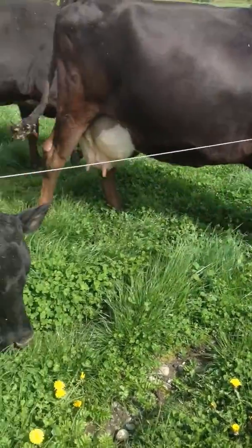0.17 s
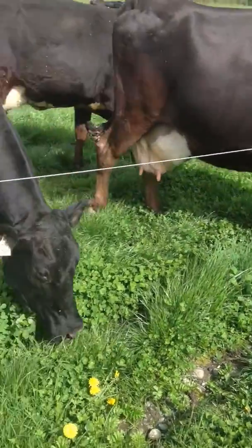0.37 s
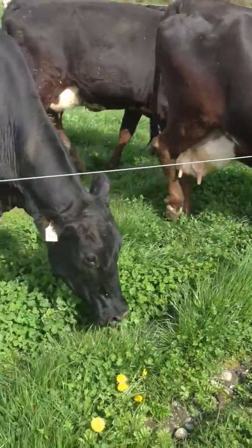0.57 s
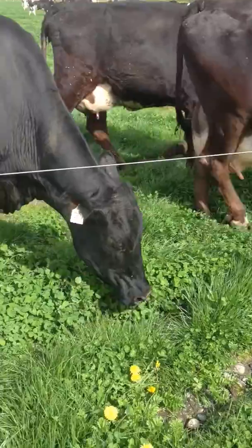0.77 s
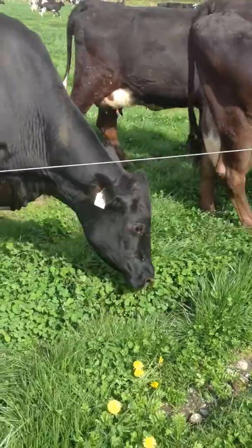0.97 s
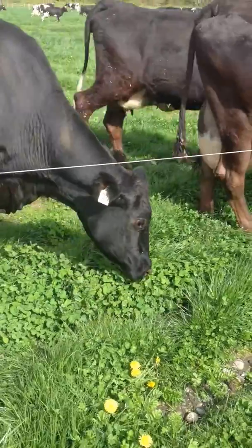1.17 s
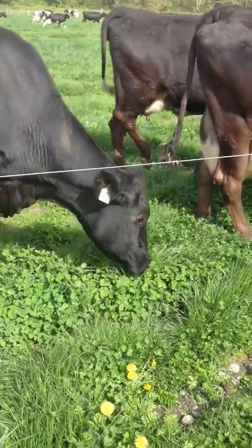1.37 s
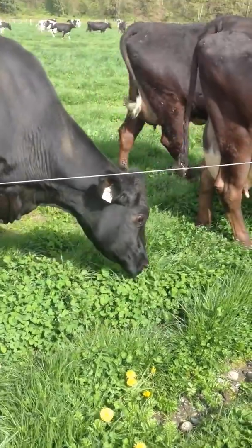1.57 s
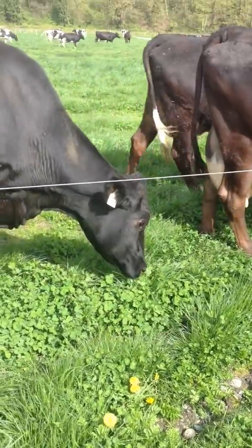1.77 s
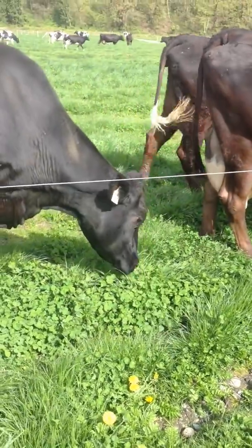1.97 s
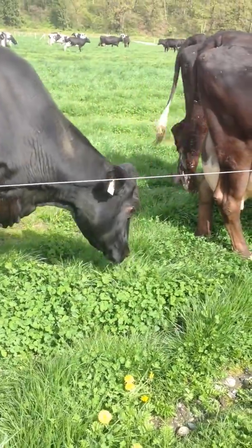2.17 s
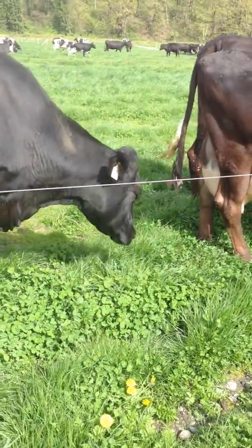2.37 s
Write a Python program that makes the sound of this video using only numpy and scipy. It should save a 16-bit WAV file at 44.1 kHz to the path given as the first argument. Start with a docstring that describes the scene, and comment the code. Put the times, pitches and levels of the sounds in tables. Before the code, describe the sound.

A cow crops grass close to the microphone in an open pasture, with crackling rips, a stalk snap and one soft blow through the nose. Wind thumps on the microphone throughout, building to a rough gust near the end.

```python
"""A cow crops grass close by in an open pasture: leaves rustle, tufts tear in swells of tiny fibre
clicks, one stalk snaps, and she blows a soft rush of air through her nose into the sward.
Wind eddies hit the microphone as pressure bumps that thump and ring in its port, building to a
rough gust near the end. A thin, very high sizzle of ringing ticks comes and goes, and a far bird
chirps once over the even hush of the field."""
import sys
import numpy as np
from scipy import signal
from scipy.fft import rfft, irfft
from scipy.io import wavfile
from scipy.ndimage import uniform_filter1d

SR = 44100
rng = np.random.default_rng(int(sys.argv[2]) if len(sys.argv) > 2 else 0)


def dump(signal):
    """Clip the signal to [-1, 1] and save it as 16-bit WAV at the path in sys.argv[1]."""
    limited = np.clip(np.atleast_2d(signal).T, -1, 1)
    pcm = np.round(limited * 32767).astype(np.int16)
    wavfile.write(sys.argv[1], SR, pcm)


N = 106148
TIME = np.arange(N) / SR

# strength of the wind on the microphone: (time [s], relative level [dB])
WIND_STRENGTH = [(0, -22.5), (.07, -32.5), (.2, -32.5), (.28, -44.5), (.36, -38), (.54, -40.5), (.62, -34),
                 (.66, -37.5), (.72, -30), (.86, -45), (1.2, -44.5), (1.26, -34), (1.4, -33.5), (1.49, -35),
                 (1.53, -43), (1.61, -35.5), (1.66, -26.5), (1.81, -29.5), (1.835, -43), (1.89, -19),
                 (1.93, -18.5), (1.965, -25.5), (2.04, -16.5), (2.14, -17.5), (2.19, -21), (2.36, -20.5),
                 (2.41, -29.5)]


def from_db(db):
    """Decibels to gain."""
    return 10 ** (np.asarray(db) / 20)


def rms_one(x):
    """Scale to unit rms."""
    return x / np.sqrt(np.mean(x ** 2) + 1e-20)


def curve(rows, t=TIME):
    """Read a (time, value) table at the given times."""
    return np.interp(t, *np.transpose(rows))


def swell(start, db, attack, decay):
    """An envelope with a straight attack and an exponential decay; times in seconds."""
    rise = np.clip((TIME - start) / attack, 0, 1)
    return from_db(db) * rise * np.exp(-np.maximum(TIME - start - attack, 0) / decay)


def coloured(x, colour):
    """Equalise a signal by a (frequency, gain) table; rms 1."""
    hz, db = np.transpose(colour)
    bins = np.maximum(np.fft.rfftfreq(N, 1 / SR), 1)
    gain = from_db(np.interp(np.log(bins), np.log(hz), db))
    return rms_one(irfft(rfft(x) * gain, N))


def resonance(x, hz, width_hz):
    """Two-pole band-pass with unit gain at its peak."""
    r = np.exp(-np.pi * width_hz / SR)
    feedback = [1, -2 * r * np.cos(2 * np.pi * hz / SR), r * r]
    return signal.lfilter(np.array([1, 0, -1]) * (1 - r * r) / 2, feedback, x + 1e-18)


def band(x, hz, width_hz):
    """Three resonances in series for steep skirts; rms 1."""
    core = resonance(x, hz, width_hz)
    return rms_one(resonance(resonance(core, hz, 2 * width_hz), hz, 2 * width_hz))


def clicks(per_s=5000, spread_db=3.0):
    """Dense random clicks of very uneven size."""
    sizes = from_db(spread_db * np.minimum(rng.exponential(1, N), 5)) * rng.choice([-1, 1], N)
    return sizes * (rng.random(N) < per_s / SR)


def pasture():
    """Steady air over the open field lays down an even bed of hush."""
    # tone of the air: (frequency [Hz], relative level [dB])
    air_colour = [(60, 2), (250, 12.5), (700, 7.5), (1500, 5.5), (3000, -2), (5000, -5), (8000, -9),
                  (12000, -19), (15500, -12)]
    return from_db(-62) * coloured(rng.standard_normal(N), air_colour)


def grass():
    """Leaves brush with a fine crackle; each torn tuft is a swell of snapping fibres."""
    # rustle of the sward: (time [s], level [dB])
    rustle_level = [(0, -57.5), (.14, -54.5), (.18, -54), (.33, -54), (.37, -55.5), (.46, -57.5),
                    (.55, -49), (.86, -51.5), (.93, -57.5), (1.1, -59), (1.24, -62.5), (1.36, -58.5),
                    (1.47, -63.5), (1.53, -65.5), (1.58, -57), (1.8, -57), (1.98, -60), (2.15, -56.5),
                    (2.4, -62)]
    # tone of brushing leaves: (frequency [Hz], relative level [dB])
    leaf_colour = [(300, -10), (700, -2), (1500, -1.5), (3000, -0.5), (5000, -1), (8000, -2.5),
                   (12000, -1.5), (15500, -4.5)]
    # tufts tearing: (start [s], peak level [dB], attack [s], decay [s])
    tears = [(0.148, -43, 0.0015, 0.017), (.258, -49, 0.0032, 0.0058), (0.316, -45.5, 0.0013, 0.0055),
             (.42, -49, .003, 0.007), (.96, -54, .002, .004), (1.0, -55, 0.015, .025),
             (1.33, -70, 0.023, .02), (1.553, -52, 0.0059, 0.017), (1.64, -50.5, .04, 0.02),
             (2.12, -55, 0.026, .05)]
    # tone of snapping fibres: (frequency [Hz], relative level [dB])
    fibre_colour = [(300, 12), (1200, 5.5), (3000, 4.5), (5000, 6.5), (8000, 4.5), (12000, 0.5),
                    (15500, -46.5)]
    brush = coloured(rng.standard_normal(N), leaf_colour)
    crackle = from_db(-4.5) * coloured(clicks(), fibre_colour)
    tearing = sum(swell(*tear) for tear in tears) * coloured(clicks(), fibre_colour)
    return from_db(curve(rustle_level)) * (brush + crackle) + tearing


def eddy_thumps(times, peaks, widths_ms):
    """Each eddy is a smooth pressure bump; the microphone's port and bass cut make it a short thump."""
    port_hz, port_q, bass_cut_hz = 158.6, 0.98, 125
    offsets = np.arange(-SR // 100, SR // 40)
    bumps = 1 / np.cosh(np.minimum(np.abs(offsets / SR * 1000 / widths_ms[:, None]), 30))
    omega = 2 * np.pi * port_hz
    port = signal.tf2sos(*signal.bilinear([1, 0, 0], [1, omega / port_q, omega ** 2], SR))
    bass_cut = signal.butter(3, bass_cut_hz, "high", fs=SR, output="sos")
    thumps = signal.sosfilt(np.vstack([port, bass_cut]), bumps - bumps[:, :1])
    thumps *= (peaks / np.abs(thumps).max(axis=1))[:, None]
    at = (times * SR).astype(int)[:, None] + offsets
    inside = (at >= 0) & (at < N)
    return np.bincount(at[inside], thumps[inside], N)


def wind_eddies():
    """A stream of small eddies, narrower and so brighter in stronger wind, with single hard buffets."""
    # single strong eddies: (time [s], relative peak [dB], width [ms])
    buffets = [(.002, -21.5, 0.74), (.015, -33, 0.92), (.038, -12, 1.1), (.122, -19.5, 1.95),
               (0.17, -45, 1.1), (.187, -24, 0.84), (0.202, -21.5, 1.8), (0.458, -21, 1.12),
               (0.605, -28, 1.5), (0.702, -20, 0.92), (0.725, -16, 1.3), (0.741, -26, 1.1),
               (0.805, -20.5, 1.02), (.816, -19.5, 0.96), (0.9, -26, 1.2), (.952, -25.5, 1.2),
               (.963, -29, 1.7), (1.038, -26, 1.5), (1.121, -30.5, 1.2), (1.184, -29.5, 0.81),
               (1.233, -23, 1.1), (1.299, -23.5, 1.56), (1.379, -26, 1.1), (1.389, -18.5, 0.89),
               (1.461, -21.5, 1.6), (1.568, -23, 1.08), (1.656, -13.5, 1.47), (1.668, -19, 0.69),
               (1.746, -17.5, 1.2), (1.816, -17.5, 0.99), (1.854, -16, 1.03), (1.894, -11.5, 0.6),
               (1.919, -14, 0.88), (1.954, -18.5, 0.4), (1.938, -16, .6), (1.985, -8, 0.79),
               (2.009, -13.5, 0.27), (2.029, -15, 0.24), (2.04, -6, 0.45), (2.063, -10, 1.4),
               (2.077, -5, 0.49), (2.085, -16, 1), (2.106, -5, 0.29), (2.114, -13, 0.29),
               (2.122, -4.5, 0.6), (2.151, -15, 0.72), (2.213, -12.5, 0.41), (2.229, -11, 0.43),
               (2.241, -11, 0.48), (2.294, -15.5, .55), (2.287, -20, 0.41), (2.352, -12.5, 0.63),
               (2.365, -15, 0.46)]
    eddies_per_s, eddy_db, spread_db = 450, -1.5, 4.5   # levels relative to the wind
    calm_width_ms, calm_db, narrowing = 1.38, -38, 0.45   # narrowing: dB of width per dB above calm
    count = int(eddies_per_s * N / SR)
    jitter, size, polarity, breadth = rng.random((count, 4)).T
    times = (np.arange(count) + jitter) / eddies_per_s
    wind_db = curve(WIND_STRENGTH, times)
    peaks = from_db(wind_db + eddy_db + spread_db * (2 * size - 1)) * np.sign(polarity - .5)
    width_scatter_db = 2 * breadth - 1
    widths_ms = calm_width_ms * from_db(width_scatter_db - narrowing * np.maximum(wind_db - calm_db, 0))
    buffet_s, buffet_db, buffet_ms = np.transpose(buffets)
    return eddy_thumps(times, peaks, widths_ms) + eddy_thumps(buffet_s, -from_db(buffet_db), buffet_ms)


def wind_on_microphone():
    """The thumps ring on in the port, and in the gust they break up into a rough flutter."""
    # resonances of the port: (frequency [Hz], bandwidth [Hz], gain [dB])
    port_modes = [(211.5, 23.4, -5), (348.5, 135, -11)]
    thumps = wind_eddies()
    rings = sum(from_db(db) * resonance(thumps, hz, width) for hz, width, db in port_modes)
    return from_db(-2) * (thumps + rings) + gust_flutter(thumps)


def sizzle():
    """Bursts of dense ticks ring in two very high bands whose pitch shifts from burst to burst."""
    # sizzle bursts: (start [s], peak level [dB], attack [s], decay [s], lower band [Hz])
    bursts = [(.126, -51, .003, .004, 12800), (.148, -33, 0.0022, 0.016, 12700),
              (.161, -35.5, 0.0054, 0.015, 12800), (.42, -45, 0.012, 0.0086, 12500),
              (0.575, -48, .012, .005, 12400), (.838, -45, 0.0061, 0.0055, 12500),
              (.855, -41.5, 0.02, 0.013, 12340), (2.02, -45, 0.014, 0.055, 12580),
              (2.065, -50, 0.029, 0.034, 13000), (2.138, -40.5, 0.014, 0.025, 13050),
              (2.186, -41.5, 0.007, 0.013, 12830), (2.25, -64, .02, 0.11, 12450)]
    band_gap_hz, upper_db = 1830, 3
    ticks, out = clicks(), 0
    for *envelope, hz in bursts:
        lower = band(ticks, hz, width_hz=420)
        upper = from_db(upper_db) * band(ticks, hz + band_gap_hz, width_hz=500)
        out = out + swell(*envelope) * rms_one(lower + upper)
    return out


def stalk_snap():
    """A thick stalk breaks with one dry, quickly damped snap."""
    start_s, hz, width_hz, peak_db = .1485, 1025, 460, -29
    click = np.zeros(N)
    click[int(start_s * SR)] = 1
    snap = resonance(resonance(click, hz, width_hz), hz, 2 * width_hz)
    return from_db(peak_db) * snap / np.abs(snap).max()


def cow_blow():
    """Air rushes softly from the cow's nostrils: one swell out of a faint, steady breath noise."""
    # swell of the breath: (time [s], level [dB])
    breath_level = [(.44, -54), (.52, -49.5), (.59, -45), (.7, -43.5), (.77, -47), (.85, -58.5),
                    (.93, -56.5)]
    # tone of the nostrils: (frequency [Hz], relative level [dB])
    nostril_colour = [(100, -31), (400, 2.5), (680, 2.5), (1200, -7), (2100, -8), (3500, -15),
                      (6000, -23.5), (11000, -21), (15500, -30)]
    return from_db(curve(breath_level)) * coloured(rng.standard_normal(N), nostril_colour)


def bird():
    """A far bird gives one faint chirp, a rising sine under a bell-shaped envelope."""
    centre_s, half_length_s, hz, rise_hz_per_s, peak_db = 1.778, .016, 3200, 7000, -58
    t = TIME - centre_s
    envelope = from_db(peak_db) * np.exp(-(t / half_length_s) ** 2)
    return envelope * np.sin(2 * np.pi * (hz + rise_hz_per_s * t / 2) * t)


def gust_flutter(thumps):
    """The gust's rough edge: midrange noise that pulses with the strength of the thumps."""
    # flutter before the thumps modulate it: (time [s], gain [dB])
    flutter_gain = [(1.87, -78.5), (1.92, -53.5), (1.97, -64), (2.0, -49), (2.08, -45), (2.125, -41),
                    (2.16, -51), (2.23, -52.5), (2.3, -55.5), (2.41, -65.5)]
    smooth_s, top_hz, pulse_exponent = .003, 1480, 1.527
    thump_rms = np.sqrt(np.abs(uniform_filter1d(thumps ** 2, int(smooth_s * SR) + 1)))
    pulse = (thump_rms / from_db(curve(WIND_STRENGTH))) ** pulse_exponent
    noise = band(rng.standard_normal(N), hz=910, width_hz=643)
    rough = rms_one(signal.sosfilt(signal.butter(3, top_hz, fs=SR, output="sos"), noise))
    return from_db(curve(flutter_gain)) * pulse * rough


def scene():
    """Everything reaches one microphone in the open air."""
    mix = pasture() + grass() + stalk_snap() + cow_blow() + sizzle() + bird() + wind_on_microphone()
    return mix[None]


def record(dry):
    """A steep low-pass trims the very top."""
    cutoff_hz = 15400
    return signal.sosfilt(signal.ellip(12, .1, 80, cutoff_hz, fs=SR, output="sos"), dry)


dry = scene()
out = record(dry)
dump(out)
```